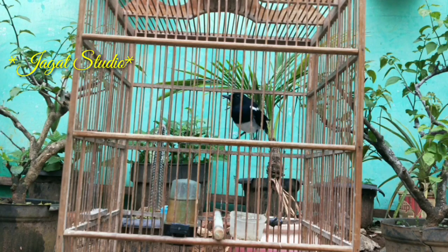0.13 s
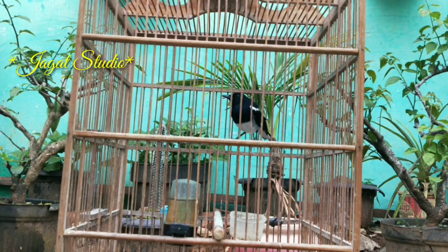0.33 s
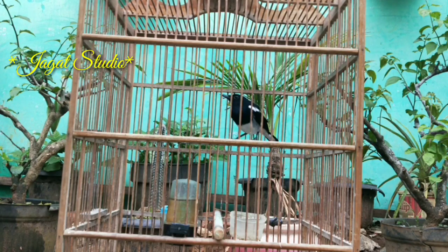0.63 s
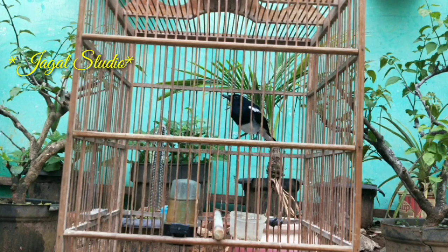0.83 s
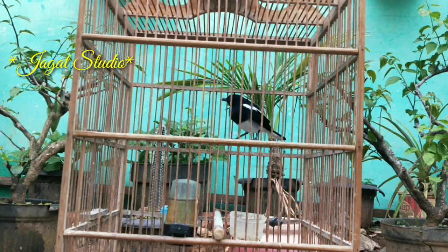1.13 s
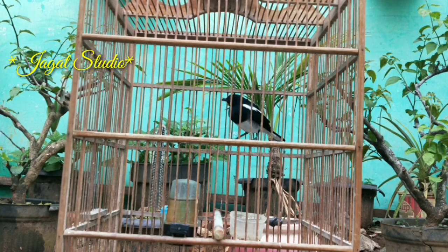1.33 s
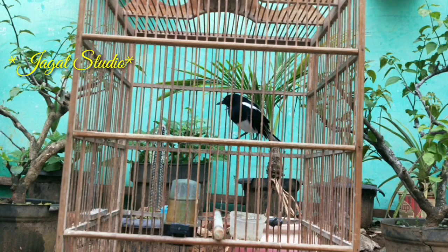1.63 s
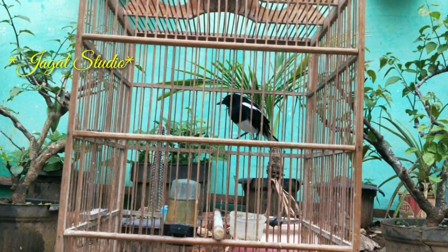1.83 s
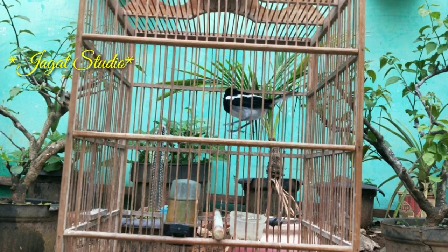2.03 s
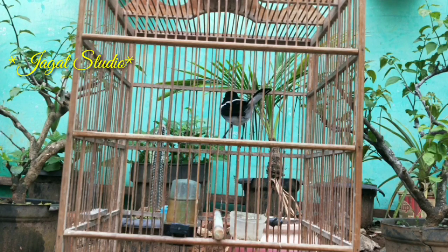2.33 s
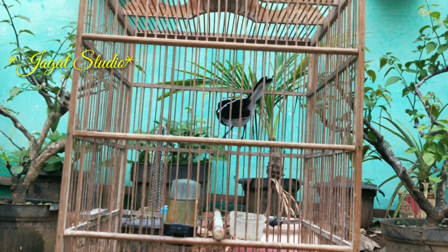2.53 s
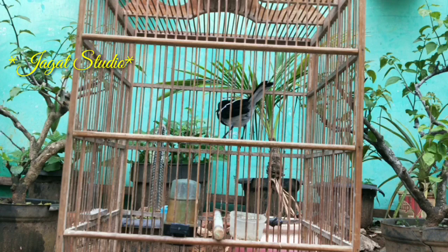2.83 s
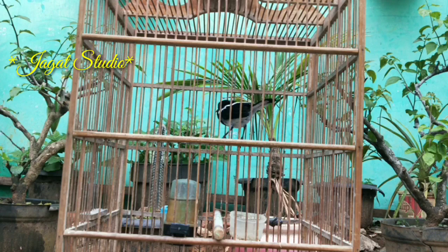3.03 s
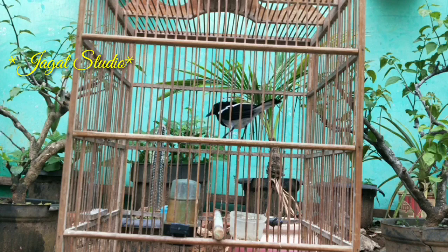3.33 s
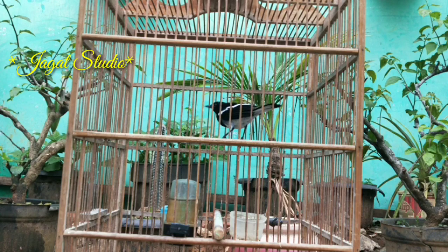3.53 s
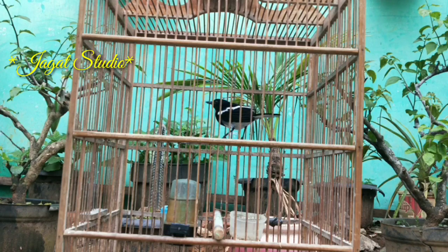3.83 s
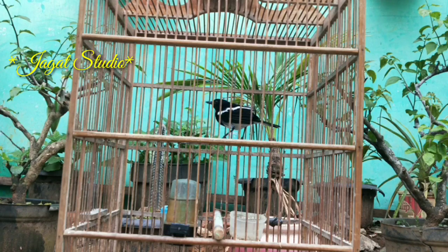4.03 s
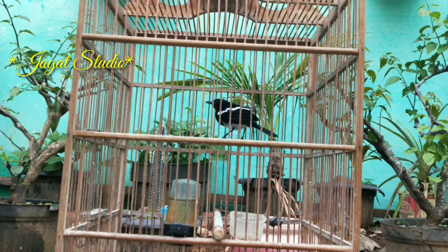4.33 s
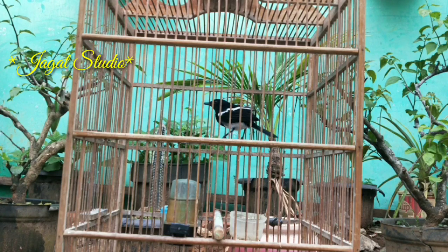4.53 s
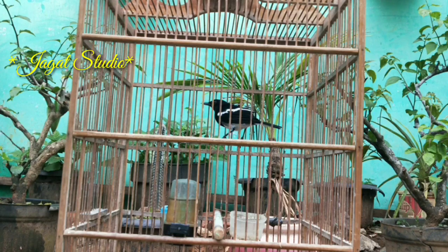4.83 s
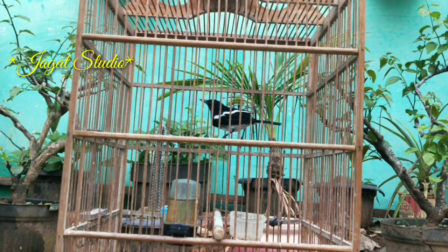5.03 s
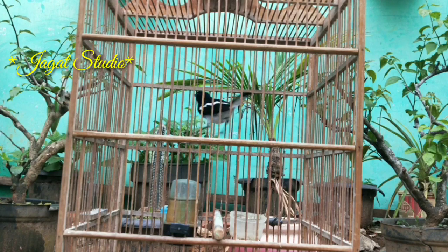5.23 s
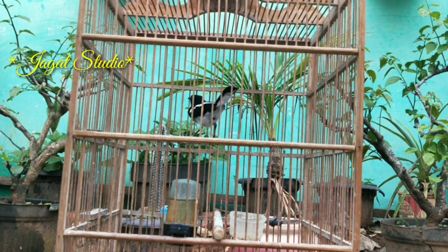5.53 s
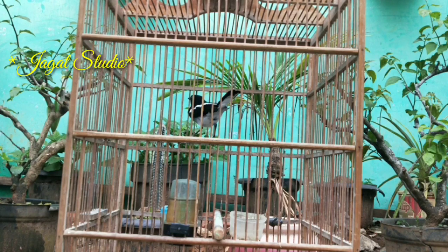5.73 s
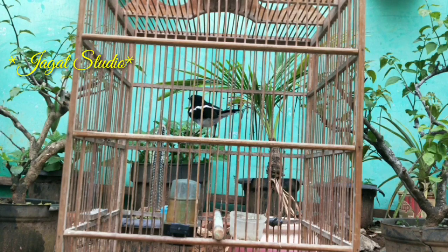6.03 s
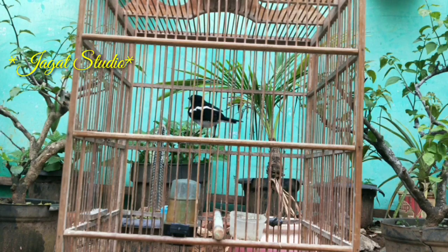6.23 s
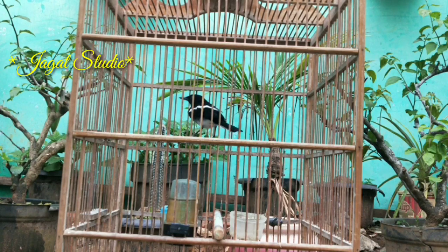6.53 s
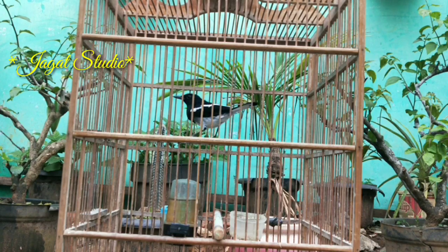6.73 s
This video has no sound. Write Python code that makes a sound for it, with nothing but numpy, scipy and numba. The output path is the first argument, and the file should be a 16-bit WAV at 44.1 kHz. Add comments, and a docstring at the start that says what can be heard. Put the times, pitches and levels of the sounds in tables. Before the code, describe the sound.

In a walled yard, a single caged magpie-robin sings close to the microphone. Two soft hoots lead into rasps and quavering whistles, then a high double-voiced whistle falls away in a ticking trill. After a short pause come quick bright chirps and a run of loud shivering downward slurs. A low traffic-like rumble swells in the pause, ducking under loud notes, and a distinct echo and long tail follow the song.

```python
"""Walled yard: a caged magpie-robin sings soft hoots, rasps and quavers, then loud falling slurs.
Two voices of its syrinx, near-sines with weak overtones and air hiss, sound alone or together.
Shaped noise makes a low rumble, like traffic, that swells and fades; a deep hum dies away at the start.
Gain control ducks the rumble under loud notes; wall reflections, a quarter-second echo and a tail follow."""
import sys
import numpy as np
from scipy import signal
from scipy.fft import rfft, irfft, next_fast_len
from scipy.io import wavfile
from scipy.ndimage import uniform_filter1d, map_coordinates
from numba import njit

SR = 44100
rng = np.random.default_rng(int(sys.argv[2]) if len(sys.argv) > 2 else 0)


def to_wav(sig):
    """Store sig (one row per channel, or 1-D mono) as 16-bit WAV at the path in sys.argv[1].

    Samples outside -1..1 are clipped; the rate is SR.
    """
    pcm = np.clip(np.atleast_2d(sig), -1, 1) * 32767
    pcm = np.round(pcm).astype(np.int16)
    wavfile.write(sys.argv[1], SR, pcm.T)  # frames by channels


N = 303408
TIME = np.arange(N) / SR


def bird():
    """The whole song; overlapping notes come from the two sides of the syrinx."""
    out = np.zeros(N)
    for kind in (arches, slurs, warbles, glides, duet, ticks):
        for t, note in kind():
            add(out, t, note)
    return out


# Hoots and whistles that rise and fall; bend 1 = straight flank, 2 = round:
# [start t/s, top t/s, end t/s, start f/Hz, top f/Hz, end f/Hz, rise bend, fall bend,
#  level/dB, second harmonic before beak/dB, roughness 0-1]
ARCHES = [ (0.029, 0.113, .150, 826, 1257, 1132, 1.28, 0.89, -11.5, -13, 0.06),
          (.282, 0.363, .394, 882, 1207, 1062, 1.28, 1.14, -8.5, -15, .05),
          (2.557, 2.59, 2.631, 2990, 3146, 2204, 1.8, 1.12, 12.5, -27.5, 0.14),
          (2.699, 2.721, 2.768, 1440, 2190, 1772, 2.44, 1.12, 7, -21, 0.02),
          (4.039, 4.070, 4.090, 2740, 2930, 2590, 2, 3, 19, -28, 0),
          (4.306, 4.411, 4.520, 1540, 2376, 1758, 1.45, 0.96, 7.5, -28.5, .02),
          (4.73, 4.755, 4.855, 2210, 3673, 2374, 2.8, 1.37, 13, -34.5, 0),
          (4.919, 4.952, 4.999, 1455, 2266, 1640, 2.6, 2.5, 6, -39.5, 0.02),
          (5.022, 5.079, 5.134, 2260, 2902, 1226, 1, .9, 6, -31, 0.05),
          (6.299, 6.332, 6.377, 1564, 2873, 1780, 1.15, 1.25, 10, -36, 0.07),
          (6.664, 6.697, 6.730, 1400, 2366, 1770, 2.3, 2.1, 12, -34, 0.04),
          (6.769, 6.851, 6.869, 2036, 3226, 2890, 1.1, 1, 12, -33.5, 0), ]
ARCH_FADE_DB = 14  # softer at the ends than at the top
ARCH_ATTACK_S, ARCH_RELEASE_S = 0.029, 0.011
ARCH_RIPPLE_HZ, ARCH_DEPTH_HZ_PER_S = 52.13, 150  # depth grows with note length


def arches():
    """Hoots and whistles: pitch and level rise to a top together and fall back."""
    for (start, top, end, start_hz, top_hz, end_hz, rise_bend, fall_bend,
         db, octave_db, rough) in ARCHES:
        t = span(start, end)
        before = np.clip((top - t) / (top - start), 0, 1)
        after = np.clip((t - top) / (end - top), 0, 1)
        rise = (start_hz - top_hz) * before ** rise_bend
        fall = (end_hz - top_hz) * after ** fall_bend
        hz = top_hz + rise + fall
        level_db = db - ARCH_FADE_DB * (before + after) ** 2
        pressure = undb(level_db) * swell(t, ARCH_ATTACK_S, ARCH_RELEASE_S)
        ripple = warble(t, start, ARCH_RIPPLE_HZ, ARCH_DEPTH_HZ_PER_S * (end - start))
        yield t, sing(t, hz, pressure, octave_db, rough, ripple)


# Loud falling slurs:
# [start t/s, end t/s, shoulder f/Hz, end f/Hz, straightness 0-1, level/dB, roughness 0-1]
SLURS = [ (5.245, 5.437, 3535, 2129, 0.39, 11, 0.11), (5.5, 5.703, 3404, 2365, 0.36, 12.5, 0.09),
         (5.785, 6.008, 3497, 2432, 0.79, 11.5, 0.02), (6.118, 6.315, 3527, 2564, .92, 17.5, .045),
         (6.559, 6.64, 3605, 3080, 0.97, 14, 0.18), ]
SLUR_DROP_HZ, SLUR_DROP_S = 1001, .009  # initial height above the shoulder, time constant
SLUR_WARBLE_HZ, SLUR_DEPTH_HZ = 53.85, 70
SLUR_ATTACK_S, SLUR_RELEASE_S, SLUR_FADE_DB, SLUR_OCTAVE_DB = 0.034, 0.028, 8, -36.5


def slurs():
    """A quick pitch drop onto a shoulder, then a shivering fall that steepens and fades."""
    for start, end, shoulder_hz, end_hz, straight, db, rough in SLURS:
        t = span(start, end)
        u = np.linspace(0, 1, len(t))
        fall = straight * u + (1 - straight) * u ** 3
        drop_hz = SLUR_DROP_HZ * np.exp(-(t - start) / SLUR_DROP_S)
        hz = shoulder_hz + (end_hz - shoulder_hz) * fall + drop_hz
        swing = warble(t, start, SLUR_WARBLE_HZ, SLUR_DEPTH_HZ) * np.sin(np.pi * u)  # deepest midway
        pressure = undb(db - SLUR_FADE_DB * u) * swell(t, SLUR_ATTACK_S, SLUR_RELEASE_S)
        yield t, sing(t, hz, pressure, SLUR_OCTAVE_DB, rough, swing)


# Warbled notes; bow lifts mid-glide; buzz of hundreds of Hz rasps, of a few Hz only leans the pitch:
# [start t/s, end t/s, from f/Hz, to f/Hz, bow/Hz, start level/dB, end level/dB,
#  second harmonic before beak/dB, roughness 0-1, warble f/Hz, depth/Hz, buzz f/Hz]
WARBLES = [ (0.601, 0.676, 2744, 2517, 35.5, -2, -0.5, -26.5, .3, 79, 110, 444),
           (0.666, 0.774, 2080, 1602, -130, -3, -17.5, -10.5, 0.12, 50.5, 165, 0),
           (0.92, 0.977, 2700, 2560, 2.5, 2, 7.5, -18, .08, 71, 40.2, 309),
           (0.933, 1.022, 1794, 1640, -2.5, -11.5, -14, -9, 0.06, 50.2, 112, -1),
           (1.067, 1.146, 1785, 1911, -45.5, 3, 2.5, -20, 0.08, 82.2, 139, 0),
           (1.136, 1.192, 2024, 2464, 60, 10.5, 4.5, -27.5, 0.01, 52.9, 215.4, 0),
           (1.28, 1.317, 1806, 3160, -120, -1.5, 5.5, -33.5, 0.03, 78.9, 340, 2),
           (1.442, 1.524, 2186, 1825, -65.5, 12, 4.5, -25.5, .024, 75, 56, 0),
           (1.662, 1.791, 2680, 2900, 208.5, 2, 5, -27.5, 0.04, 47.3, 140, 586.5),
           (1.679, 1.863, 2404, 1730, 171, -2, -12, -11, .17, 44.86, 124, 0),
           (2.037, 2.158, 2860, 2745, -40, 11.5, 17, -33, 0.01, 35.4, 86, -0.5),
           (2.046, 2.117, 2100, 1650, -6.5, -6.5, -7, -23, 0.14, 44.1, 130.6, 0.5),
           (2.148, 2.278, 2740, 2076, -9, 16, -2.5, -30, 0.02, 35.1, 186, 0),
           (4.014, 4.051, 2620, 2860, -1, -5.5, 14.5, -31.5, 0.04, 109, 150, -1),
           (4.175, 4.268, 1996, 2415, 149.5, 13.5, 5.5, -30, 0, 36.9, 50, 0), ]
BUZZ_DEPTH_HZ = 278
ATTACK_S, RELEASE_S = 0.017, 0.014  # warbles and glides


def warbles():
    """Quavers and rasps: a glide with regular pitch swing, plus a fast buzz on some notes."""
    for (start, end, from_hz, to_hz, bow_hz, start_db, end_db,
         octave_db, rough, rate_hz, depth_hz, buzz_hz) in WARBLES:
        t = span(start, end)
        buzz = BUZZ_DEPTH_HZ * np.sin(2 * np.pi * buzz_hz * (t - start))
        swing = warble(t, start, rate_hz, depth_hz) + buzz
        pressure = undb(np.linspace(start_db, end_db, len(t))) * swell(t, ATTACK_S, RELEASE_S)
        yield t, sing(t, glide(t, from_hz, to_hz, bow_hz), pressure, octave_db, rough, swing)


# Plain glides, mostly the second voice under another note:
# [start t/s, end t/s, from f/Hz, to f/Hz, bow/Hz, start level/dB, end level/dB,
#  second harmonic before beak/dB]
GLIDES = [ (.960, 1.023, 2450, 2530, -60, 18, 2, -20), (1.014, 1.077, 1690, 1630, -50.5, -5, -1, -0.5),
          (1.277, 1.324, 1650, 1634, -62.5, -15.5, -5.5, -16.5),
          (1.304, 1.369, 3220, 2600, -250, 12.5, 10, -28), (1.328, 1.446, 1800, 1728, 1.5, -16.5, 6.5, -8),
          (1.636, 1.71, 1685, 1727, 74, -21, -20, -13), (2.026, 2.064, 2880, 3330, 5, -3.5, 10.5, -27),
          (4.073, 4.137, 2783, 3000, -130, 19.5, -0.5, -22), (5.625, 5.685, 2780, 2250, 1, -4, -15, -21),
          (5.909, 5.951, 2800, 2345, 8.5, -5, -8.5, -25), (6.178, 6.255, 2930, 2450, -6, 6, -3, -23),
          (6.274, 6.319, 1625, 2044, -130, -26, -4.5, -1), (6.319, 6.348, 3860, 2870, -3, -4, -2, -26),
          (6.58, 6.638, 2950, 1885, -61, 9, -32, -20), ]
GLIDE_ROUGH = .05


def glides():
    """Plain notes that slide without a warble."""
    for start, end, from_hz, to_hz, bow_hz, start_db, end_db, octave_db in GLIDES:
        t = span(start, end)
        pressure = undb(np.linspace(start_db, end_db, len(t))) * swell(t, ATTACK_S, RELEASE_S)
        yield t, sing(t, glide(t, from_hz, to_hz, bow_hz), pressure, octave_db, GLIDE_ROUGH)


# Pitch and level of the two simultaneous voices: [t/s, f/Hz, level/dB]
DUET_LOW = [(3.074, 2920, -12.5), (3.087, 3096, 7.5), (3.118, 3243, 15), (3.168, 3160, 6),
            (3.185, 3700, 5.5), (3.2, 3810, -8.5)]
DUET_HIGH = [(3.075, 4130, -19), (3.12, 4300, 1), (3.17, 4320, -4.5), (3.195, 4680, -3.5),
             (3.215, 4320, 2.5), (3.31, 4166, -4), (3.4, 3915, 1.5), (3.462, 3390, -5)]
DUET_OCTAVE_DB, DUET_ROUGH = -28, .02
TRILL_START_S, TRILL_HZ, TRILL_DEPTH_HZ = 3.2315, 32.2, 107


def duet(edge_s=0.0013):
    """Both sides whistle at once; the upper one goes on into a falling trill."""
    for path, depth_hz in ((DUET_LOW, 0), (DUET_HIGH, TRILL_DEPTH_HZ)):
        s, hz, db = np.transpose(path)
        t = span(s[0], s[-1])
        pressure = undb(np.interp(t, s, db)) * swell(t, edge_s, edge_s)
        trill = warble(t, TRILL_START_S, TRILL_HZ, depth_hz)
        yield t, sing(t, np.interp(t, s, hz), pressure, DUET_OCTAVE_DB, DUET_ROUGH, trill)


# Tick centres decay from FIRST towards LAST
TICK_FIRST_HZ, TICK_LAST_HZ, TICK_SETTLE_S = 3656, 2128, 0.074
TICK_S, TICK_FALL_HZ, TICK_DB, TICK_OCTAVE_DB, TICK_ROUGH = 0.011, 597, -6.5, -6.5, 0.12


def ticks(count=7):
    """Short falling ticks of the low voice on the trill crests, each lower than the last."""
    for since in np.arange(count) / TRILL_HZ:
        crest = TRILL_START_S + .5 / TRILL_HZ + since
        t = span(crest, crest + TICK_S)
        centre_hz = TICK_LAST_HZ + (TICK_FIRST_HZ - TICK_LAST_HZ) * np.exp(-since / TICK_SETTLE_S)
        hz = centre_hz + TICK_FALL_HZ * np.linspace(.5, -.5, len(t))
        pressure = undb(TICK_DB) * swell(t, TICK_S / 5, TICK_S / 2)
        yield t, sing(t, hz, pressure, TICK_OCTAVE_DB, TICK_ROUGH)


# Windpipe response, weak below the song: [f/Hz, level/dB]
WINDPIPE = [(300, -40.5), (800, -16), (1300, -9), (1700, 0), (3500, -1.5), (5000, 4.5), (7000, -4.5),
            (15000, -5.5)]
WIDE_THROAT_HZ = 1400


def sing(t, hz, pressure, octave_db, rough, swing=0, crest_db=14):
    """Tone and air noise, louder on pitch crests; low hoots pass freely through a widened throat."""
    pressure = pressure * undb(crest_db * swing / hz)
    note = pressure * (syrinx(t, hz + swing, octave_db, rough) + hiss(t, hz, rough))
    return note if hz.max() < WIDE_THROAT_HZ else shape(note, WINDPIPE)


# Throat and beak response to overtones: [f/Hz, level/dB]
BEAK = [(2000, -8.5), (4400, -3), (5000, -11.5), (6000, -13.5), (7200, -10.5), (9500, -6), (12000, -6.5),
        (15500, -9)]
# Overtones above the second, before the beak: [multiple, level/dB]
OVERTONES = [(3, -24.5), (4, -52), (5, -38.5)]


def syrinx(t, hz, octave_db, rough, waver=0.0087, flutter_db=1.5, rough_rate=1100, rough_bend=.2,
           blur=0.89, blur_rate=600):
    """One membrane: near-sine with weak, unsteady overtones; irregular motion makes it harsh."""
    hz = hz * (1 + waver * wander(t, 217) + rough_bend * rough * wander(t, rough_rate))
    phase = 2 * np.pi * np.cumsum(hz) / SR
    tone = np.sin(phase)
    for k, db in [(2, octave_db)] + OVERTONES:
        k = round(k)
        slip = blur * (k * hz / 8000) * wander(t, blur_rate)  # higher overtones smear more
        gain = undb(db + curve(BEAK, k * hz) + 2.2 * wander(t, 90))
        tone += gain * np.sin(k * phase + slip) * (k * hz < SR / 2)
    flutter = undb(flutter_db * wander(t, 120))
    return np.sqrt(2) * tone * flutter * (1 + rough * wander(t, rough_rate))


# Spectrum of air through the beak: [f/Hz, level/dB]
HISS_COLOUR = [(1000, -31.5), (2500, -2.5), (4500, 5), (6000, -13), (9000, -4.5), (12000, -6.5),
               (15500, -9.5)]


def hiss(t, hz, rough, hiss_db=-44.5, per_octave_db=12, rough_db=35):
    """Air noise of a note: stronger when high or harsh."""
    level_db = hiss_db + per_octave_db * np.log2(hz / 3000) + rough_db * rough
    return colour(rng.standard_normal(len(t)), HISS_COLOUR) * undb(level_db)


def warble(t, start, rate_hz, depth_hz, cusp=0.28):
    """Pitch swing in Hz from a trough: sharp crests, round troughs, eased in over a quarter turn."""
    turn = 2 * np.pi * rate_hz * (t - start)
    return depth_hz * (cusp * np.cos(2 * turn) - np.cos(turn)) * gate(t, start, np.inf, .25 / rate_hz)


def glide(t, from_hz, to_hz, bow_hz):
    """Pitch moving between two values along a bow."""
    u = np.linspace(0, 1, len(t))
    return from_hz + (to_hz - from_hz) * u + bow_hz * (1 - (2 * u - 1) ** 2)


def swell(t, attack_s, release_s):
    """Air pressure of a note: attack, hold, release."""
    return gate(t, t[0], np.inf, attack_s) * gate(t, -np.inf, t[-1], release_s)


def couple(x, mix_db=-33, window_s=0.0065):
    """Voices sharing one airway bend each other: a level-tracking cubic adds combination tones."""
    power = np.maximum(uniform_filter1d(x ** 2, int(window_s * SR)), 1e-9)
    return x + undb(mix_db) * (x ** 3 / power - 0.84 * x)  # partly cancels the tone itself


# Rumble level before trim: [t/s, level/dB]
RUMBLE = [(0, -33.5), (1.1, -28.5), (2.0, -34), (3.0, -23.5), (3.3, -22.5), (3.65, -11.5), (4.9, -11.5),
          (5.3, -15), (5.8, -29.5), (6.15, -29), (6.5, -22), (6.88, -35.5)]
# Rumble spectral density: [f/Hz, level/dB per Hz]
RUMBLE_COLOUR = [(18, -54.5), (30, -24), (81, 2), (129, -7), (175, -7), (218, -11), (293, -16), (354, -15),
                 (402, -16.5), (551, -18.5), (695, -22), (1550, -25.5), (2520, -29), (3170, -24.5),
                 (4640, -51.5), (6030, -60.5), (10200, -120)]
# Extra level of the rumble's bass: [t/s, level/dB]
BASS = [(0, -4.5), (1.1, -3), (3.5, 1), (5.2, -2.5), (6.35, 7.5), (6.88, 4)]
# Deep hum, dying away: [t/s, level/dB]
HUM = [(0, -21.5), (.55, -30.5), (1.0, -52)]
HUM_HZ = 38


def rumble(surge_db=2.2, surge_rate=14, lump_db=3.8, lump_rate=22, split_hz=280, trim_db=-1):
    """Slowly swelling low noise whose bass heaves on its own, plus a wavering sine hum."""
    noise = colour(rng.standard_normal(N), RUMBLE_COLOUR)
    bass = signal.sosfiltfilt(signal.butter(2, split_hz, fs=SR, output="sos"), noise)
    heave = undb(curve(BASS, TIME) + lump_db * wander(TIME, lump_rate))
    noise = noise - bass + bass * heave
    hum = np.sqrt(2) * np.sin(2 * np.pi * HUM_HZ * TIME + .5 * wander(TIME, 10))
    noise_db = curve(RUMBLE, TIME) + trim_db + surge_db * wander(TIME, surge_rate)
    return noise * undb(noise_db) + hum * undb(curve(HUM, TIME))


def undb(db):
    """Decibels to gain."""
    return 10 ** (np.asarray(db) / 20)


def curve(rows, x):
    """Join (x, value) rows by straight lines."""
    return np.interp(x, *np.transpose(rows))


def shape(x, points):
    """Filter by (Hz, dB) points, joined over log frequency."""
    hz, db = np.transpose(points)
    size = next_fast_len(len(x))
    bins = np.maximum(np.fft.rfftfreq(size, 1 / SR), 1)
    gain = undb(np.interp(np.log(bins), np.log(hz), db))
    return irfft(rfft(x, size) * gain, size)[:len(x)]


def colour(x, points):
    """Shape a noise by a spectrum and scale it to unit standard deviation."""
    y = shape(x, points)
    return y / y.std()


def wander(t, rate):
    """Smooth random curve, spread near 1, about rate new values a second."""
    place = (t - t[0]) * rate
    own = np.random.default_rng(rng.integers(2 ** 31))
    values = own.standard_normal(int(place[-1]) + 4)
    return map_coordinates(values, [place + 1], order=3, mode="nearest")


def gate(t, start, end, edge):
    """1 between start and end, with rounded edges inside."""
    return np.sin(np.pi / 2 * np.clip(np.minimum(t - start, end - t) / edge, 0, 1)) ** 2


def span(start, end):
    """Sample times from start to end."""
    return TIME[max(int(start * SR), 0):int(end * SR)]


def add(out, t, sound):
    """Mix a sound in at its times."""
    out[np.rint(t * SR).astype(int)] += sound


def delayed(x, seconds):
    """The sound a little later."""
    return np.interp(TIME - seconds, TIME, x, left=0)


# Close wall reflections: [delay t/s, gain]
WALLS = [(.0047, 0.2), (0.0118, 0.04), (0.0248, 0.075)]


def scene():
    """The bird with its reflections from the yard walls, over the rumble."""
    song = couple(bird())
    reflections = sum(gain * delayed(song, s) for s, gain in WALLS)
    background = rumble() * gate(TIME, 0, np.inf, 0.0034)
    return (song + reflections + background)[None]


@njit
def hold(db, fall):
    """Follow a level up at once, down by at most a fixed step a sample."""
    out = db.copy()
    for i in range(1, len(db)):
        out[i] = max(db[i], out[i - 1] - fall)
    return out


def gain_control(x, threshold_db=-14.4, ratio=4.62, level_fall_db_per_s=95, window_s=.008):
    """Loud notes push the gain down; it creeps back in the gaps."""
    power = np.maximum(uniform_filter1d(x ** 2, int(window_s * SR)), 1e-12)
    level_db = hold(10 * np.log10(power), level_fall_db_per_s / SR)
    return x * undb(-(1 - 1 / ratio) * np.maximum(level_db - threshold_db, 0))


ECHO_S, ECHO_DB, ECHO_TOP_HZ = .2537, -10, 3500


def echo(x):
    """One later, quieter copy, dulled by a low-pass."""
    dull = signal.sosfilt(signal.butter(2, ECHO_TOP_HZ, fs=SR, output="sos"), x)
    return undb(ECHO_DB) * delayed(dull, ECHO_S)


# Spectrum of the reverberant tail: [f/Hz, level/dB]
TAIL_COLOUR = [(100, -23), (700, -21), (1200, -1), (2500, 1.5), (3400, -3), (4500, -10.5), (6000, -1),
               (14000, -17)]
TAIL_T60_S, TAIL_DB = 1.99, -12  # level is the mean gain over 2-3.5 kHz


def reverberation(x, build_s=0.0022):
    """Convolve with decaying noise: a diffuse tail that builds up quickly and dies away."""
    t = TIME[:2 * SR]
    envelope = undb(-60 * t / TAIL_T60_S) * (1 - np.exp(-t / build_s))
    response = colour(rng.standard_normal(len(t)), TAIL_COLOUR) * envelope
    band = np.abs(rfft(response))[4000:7000]  # half-hertz bins
    response = response / np.sqrt(np.mean(band ** 2))
    return undb(TAIL_DB) * signal.fftconvolve(x, response)[:N]


def round_peaks(x, ceiling=0.93, knee=3.34):
    """Soft overload: mainly the tallest crests are flattened."""
    return x / (1 + np.abs(x / ceiling) ** knee) ** (1 / knee)


CUT_HZ = 15700


def record(dry):
    """Gain control, one duller echo, reverberant tail, slight overload, treble cut-off."""
    x = gain_control(dry[0])
    x = x + echo(x)
    x = round_peaks(x + reverberation(x))
    return signal.sosfilt(signal.ellip(8, .2, 70, CUT_HZ, fs=SR, output="sos"), x)[None]


dry = scene()
out = record(dry)
to_wav(out)
```